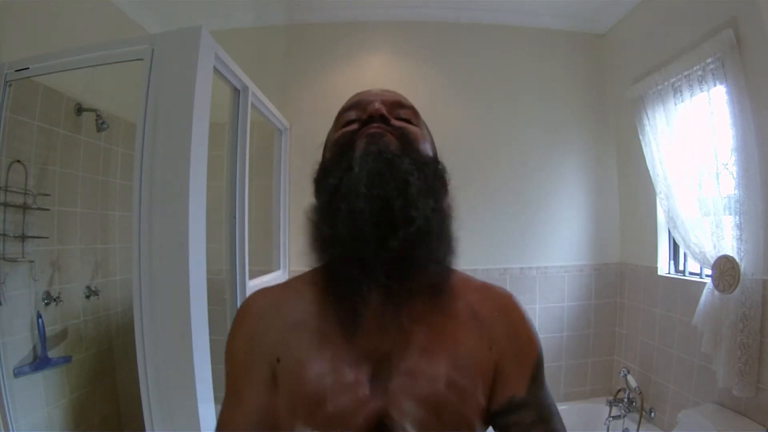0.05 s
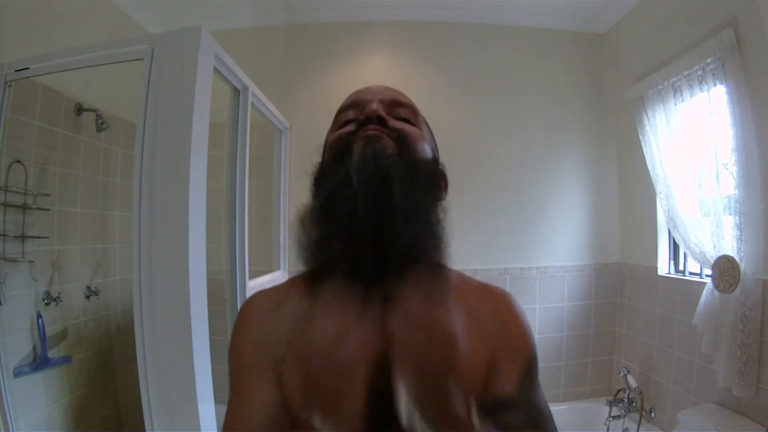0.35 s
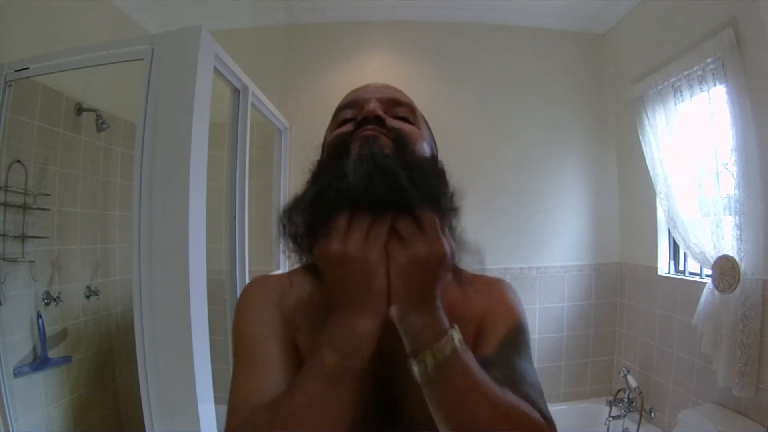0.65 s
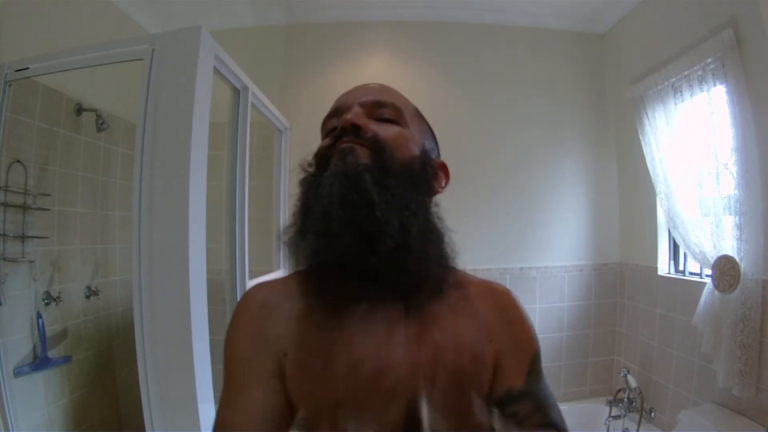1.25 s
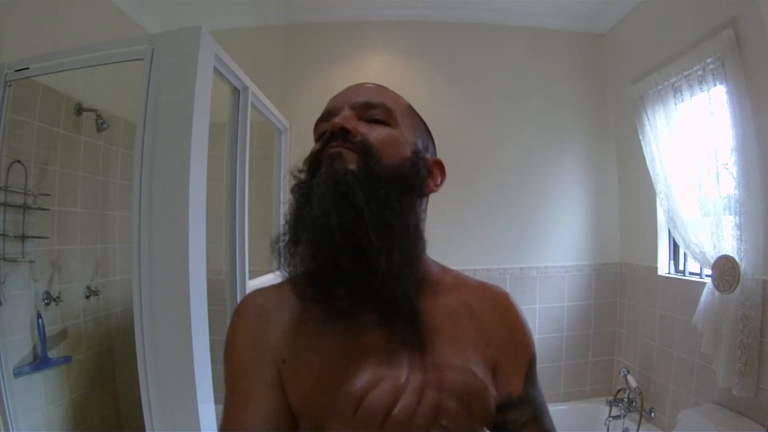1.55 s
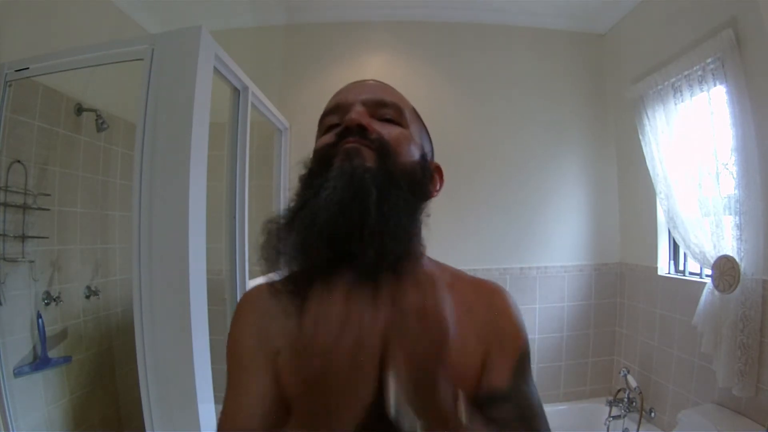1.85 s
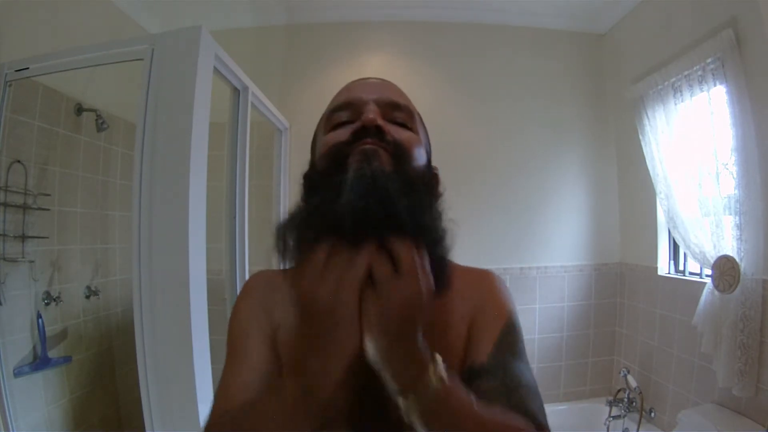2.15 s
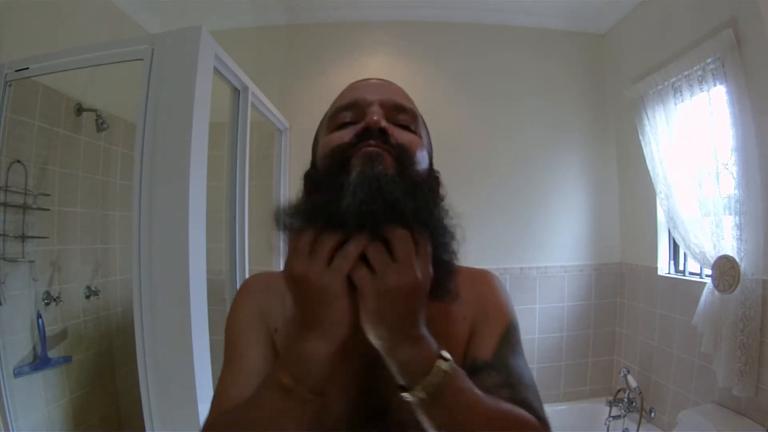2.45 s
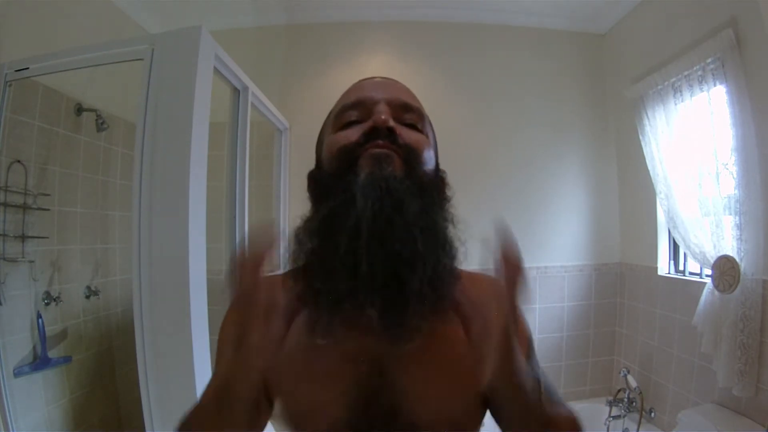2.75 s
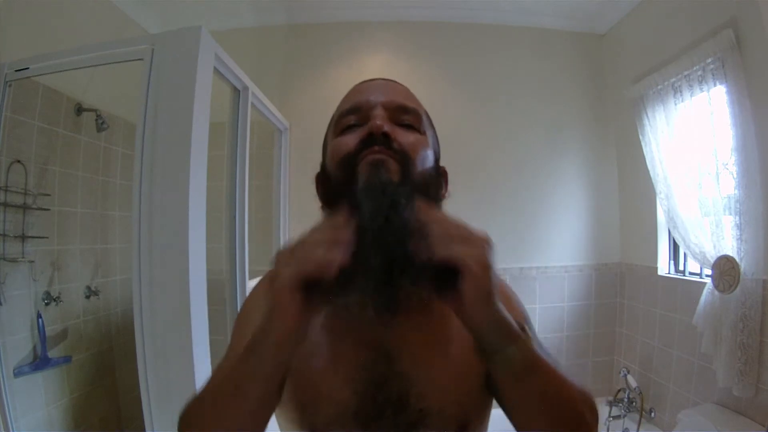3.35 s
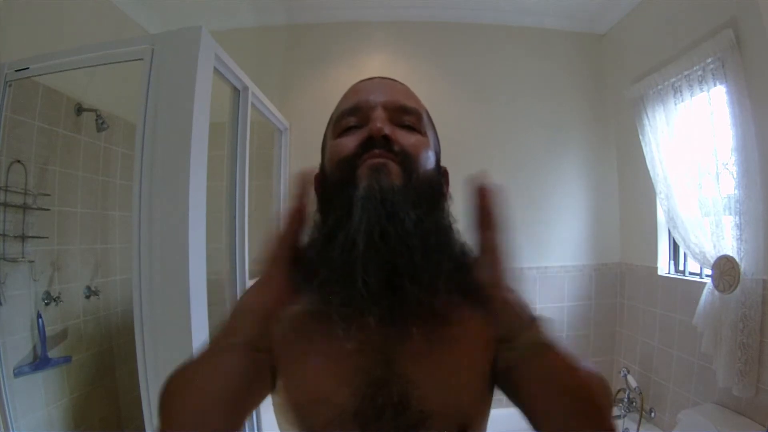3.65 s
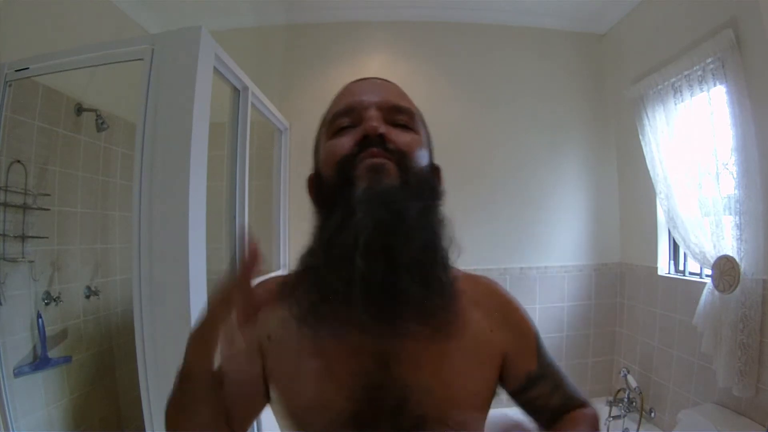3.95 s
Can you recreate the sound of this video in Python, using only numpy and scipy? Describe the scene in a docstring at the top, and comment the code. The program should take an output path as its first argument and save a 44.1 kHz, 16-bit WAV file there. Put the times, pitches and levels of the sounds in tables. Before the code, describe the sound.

Hands brush through a long beard in soft swishes, several a second, with duller skin rubs and a few short scratches. A fan hums and blows steadily in the small tiled bathroom, and the strokes sound straight ahead.

```python
"""Two hands brush up through a long beard in a small tiled bathroom, nearly three strokes a second.
Each stroke is a soft swish of countless hairs slipping past the fingers, with a duller rub of skin
and at times a hollow tone or a short scratch. A fan hums and blows steadily. A soft rush and a low
rumble swell and sink, and a thin electronic whine pulses faintly above them."""
import sys
import numpy as np
from scipy import signal
from scipy.fft import rfft, irfft
from scipy.io import wavfile
from scipy.ndimage import uniform_filter1d

SR = 44100
rng = np.random.default_rng(int(sys.argv[2]) if len(sys.argv) > 2 else 0)


def output_pcm(signal):
    """Save a mono or channel-first signal as 16-bit PCM at the path in sys.argv[1].

    Samples are clipped to [-1, 1] before scaling.
    """
    pcm = np.clip(np.atleast_2d(signal).T, -1, 1) * 32767
    wavfile.write(sys.argv[1], SR, np.round(pcm).astype(np.int16))


N = 176400
TIME_S = np.arange(N) / SR
FREQS_HZ = np.maximum(np.fft.rfftfreq(N, 1 / SR), 1)

# Hand strokes. Each row: time of fastest motion, rise and fall in seconds,
# hair swish, skin rub and hollow tone in dB, hollow tone pitch in Hz.
STROKES = [(.01, .04, 0.044, -64, -58.5, -64, 1510), (.185, 0.025, 0.037, -62.5, -69, -74, 1700),
           (.348, .056, 0.06, -59, -60, -64, 1760), (.535, 0.021, 0.033, -65.5, -62, -70, 1700),
           (.753, .045, 0.019, -56.5, -62, -56.5, 1690), (.84, 0.024, 0.064, -66, -62, -68, 1710),
           (1.126, 0.039, 0.03, -58, -56, -55.5, 1720), (1.36, 0.05, 0.042, -67, -64, -68, 1600),
           (1.503, 0.045, 0.04, -61.5, -60, -58.5, 1640), (1.64, 0.022, .025, -66, -68, -66, 1650),
           (1.865, 0.041, 0.033, -62, -59, -61, 1610), (2.20, 0.06, 0.046, -61.5, -62.5, -74, 1600),
           (2.44, 0.022, 0.02, -65, -57.5, -78, 1550), (2.564, 0.041, 0.056, -62, -60.5, -60.5, 1540),
           (2.73, 0.056, 0.091, -74, -63, -66, 1420), (2.85, 0.009, 0.013, -51.5, -61, -66, 1390),
           (2.95, 0.08, 0.067, -64.5, -57.5, -65, 1450), (3.43, 0.066, 0.096, -61.5, -65.5, -70, 1520),
           (3.755, .035, 0.036, -63.5, -64, -69, 1610)]
# Hair swish colour. Each row: frequency in Hz, relative level in dB.
HAIR_SPECTRUM = [(1500, 7), (3000, -2.5), (6000, -1), (9000, 1), (12500, 3.5), (15000, 2.5)]
# Skin rub colour. Each row: frequency in Hz, relative level in dB.
SKIN_SPECTRUM = [(250, -39), (600, 0.5), (1300, 1), (2100, -8), (3000, -5.5), (4200, -12.5), (7000, -19),
                 (14000, -41)]
# Fingertip scratches. Each row: peak time in seconds, rise and fall time in seconds,
# level in dB, centre in Hz.
SCRATCHES = [(0.364, 0.031, -68, 2950), (0.752, .03, -65, 2530), (1.128, .025, -72, 2580),
             (1.335, .008, -67, 4730), (1.52, 0.03, -66, 2600), (2.15, 0.02, -68, 3600),
             (2.844, 0.0053, -61.5, 4700), (2.943, .014, -68, 3700)]
# Fan hum. Each row: multiple of the turning rate, rms level in dB, flutter depth as a ratio.
FAN_ORDERS = [(2, -62.5, 0.88), (3, -45, 0.06), (4, -53.5, 0.49), (8, -60, 0.82), (12, -69, 0.22),
              (16, -74.5, 0.18), (18, -80, 0.44)]
# Fan resonances. Each row: centre in Hz, half-width in Hz, rms level in dB.
FAN_RESONANCES = [(361, 4.5, -63), (487, 3.9, -64.5), (571, 24, -62.5), (770.5, 9, -65), (5210, 7.8, -85.5),
                  (8620, 210, -82)]
# Fan air and even hiss. Each row: frequency in Hz, density in dB per Hz.
AIR_SPECTRUM = [(20, -77), (60, -80.5), (150, -80), (200, -79), (300, -77.5), (520, -79), (680, -85),
                (810, -81.5), (880, -88.5), (1030, -86), (1400, -89), (1750, -94), (2100, -97.5),
                (3000, -99.3), (3800, -103), (5100, -104), (6000, -106), (7800, -105.3), (10000, -107.3),
                (15000, -106.8)]
# Stereo width of the air. Each row: frequency in Hz, side minus mid in dB.
AIR_WIDTH = [(25, 0), (85, -17), (140, -22), (250, -54), (650, -51), (1300, -52), (2400, -16.5), (4400, -6),
             (8000, -4), (15000, -5.5)]
# Low-mid rush envelope. Each row: time in seconds, rms level in dB.
RUSH_ENVELOPE = [(0, -61), (.35, -59), (.75, -66), (2.25, -66), (2.45, -58.5), (2.95, -58.5), (3.3, -59),
                 (4, -60.5)]
# Low rumble envelope. Each row: time in seconds, rms level in dB.
RUMBLE_ENVELOPE = [(0, -73), (2.0, -67), (2.25, -56.5), (2.6, -63), (2.85, -53.5), (3.2, -65.5),
                   (3.55, -56), (4, -59)]

BASE_SLIPS_PER_S, SLIP_SPREAD_DB, HISS_POWER_SHARE = 9000, 3.5, 0.21
CATCH_DB, CATCH_RATE_HZ = 1.4, 48
SWELL_EXPONENT = 1.26   # 1 pointed, 2 round
HAND_SIDE_DB, ROOM_DB, ROOM_T60_S = -25, -8.5, 0.17
FAN_TURN_HZ, FAN_WANDER_HZ, FAN_FLUTTER_HZ = 83.83, 0.11, 3.6
WHINE_HZ, WHINE_ON_DB, WHINE_PULSE_HZ, WHINE_START_S = 7867, -70, 30.03, .0237
CUTOFF_HZ, CUTOFF_SLOPE_HZ = 15300, 100
LEFT_OFFSET, RIGHT_OFFSET = -.0661, .0638   # full scale 1


def hands():
    """Swish, rub, hollow tones and scratches, straight ahead, with room reflections."""
    swish_gain, rub_gain = stroke_gains()
    speed = swish_gain / swish_gain.max()
    hair, hair_side = (swish_gain * unit_rms(colour(hair_slips(speed), HAIR_SPECTRUM)) for _ in range(2))
    skin = rub_gain * unit_rms(colour(hair_slips(speed), SKIN_SPECTRUM))
    direct = hair + skin + hollow_tones() + scratches()
    return stereo(direct + from_db(ROOM_DB) * bathroom(direct), from_db(HAND_SIDE_DB) * hair_side)


def stroke_gains():
    """Swish and rub gains: strokes swell and fade while the fingers catch and slide unevenly."""
    power = np.zeros((2, N))
    for peak_s, rise_s, fall_s, hair_db, skin_db, _, _ in STROKES:
        power += from_db([hair_db, skin_db])[:, None] ** 2 * swell(peak_s, rise_s, fall_s)
    return np.sqrt(power) * from_db(CATCH_DB * drift(CATCH_RATE_HZ))


def swell(peak_s, rise_s, fall_s):
    """Power of a movement building to its fastest moment, then fading."""
    span_s = np.where(TIME_S < peak_s, rise_s, fall_s)
    return np.exp(-np.abs((TIME_S - peak_s) / span_s) ** SWELL_EXPONENT)


def hair_slips(speed):
    """Tiny uneven clicks, denser as the hand moves faster, on an even hiss."""
    chance = np.clip(BASE_SLIPS_PER_S * (.2 + speed) / SR, .001, 1)
    sizes = from_db(SLIP_SPREAD_DB * np.minimum(rng.exponential(1, N), 5))
    signs = rng.choice([-1, 1], N)
    clicks = unit_rms(sizes * signs * (rng.random(N) < chance) / np.sqrt(chance))
    return np.sqrt(1 - HISS_POWER_SHARE) * clicks + np.sqrt(HISS_POWER_SHARE) * white()


def hollow_tones():
    """Cupped hands ring at a pitch that changes from stroke to stroke."""
    noise = white()
    return sum(from_db(db) * np.sqrt(swell(peak_s, rise_s, fall_s)) * resonate(noise, hz, half_hz=200)
               for peak_s, rise_s, fall_s, _, _, db, hz in STROKES)


def scratches():
    """Fingertips rasp across the hairs; slow slips, so single hairs are heard."""
    slips = hair_slips(speed=0.21)
    return sum(from_db(db) * np.sqrt(swell(peak_s, span_s, span_s)) * resonate(slips, hz, half_hz=540)
               for peak_s, span_s, db, hz in SCRATCHES)


def bathroom(x):
    """Dense tile reflections, decaying evenly."""
    tail = white() * from_db(-60 * TIME_S / ROOM_T60_S) * (TIME_S > .004)
    return signal.fftconvolve(x, tail / np.sqrt(np.sum(tail ** 2)))[:N]


def fan_hum():
    """Fluttering multiples of the turning rate, plus narrow resonances."""
    turns = np.cumsum(FAN_TURN_HZ + FAN_WANDER_HZ * drift(rate_hz=1.54)) / SR
    hum = np.zeros(N)
    for order, db, depth in FAN_ORDERS:
        flutter = 1 + depth * (drift(FAN_FLUTTER_HZ) + 1j * drift(FAN_FLUTTER_HZ)) / np.sqrt(2)
        tone = np.exp(2j * np.pi * (order * turns + rng.random()))
        hum += from_db(db) * unit_rms(np.real(flutter * tone))
    return hum + sum(from_db(db) * resonate(white(), hz, half_hz) for hz, half_hz, db in FAN_RESONANCES)


def fan_air():
    """Steady airflow, centred in the midrange, wider in the hiss."""
    noise = stereo(white(), colour(white(), AIR_WIDTH))
    return np.sqrt(SR / 2) * colour(noise, AIR_SPECTRUM)


def rush():
    """Soft low-mid noise; sinks early, returns in the second half."""
    return envelope(RUSH_ENVELOPE) * resonate(white(), hz=698, half_hz=130)


def rumble():
    """Soft low noise; swells a few times in the second half."""
    return envelope(RUMBLE_ENVELOPE) * resonate(white(), hz=105, half_hz=70)


def whine():
    """Thin electronic tone, on for half of each pulse cycle."""
    on = ((TIME_S - WHINE_START_S) * WHINE_PULSE_HZ) % 1 < .5
    gate = uniform_filter1d(on.astype(float), size=110)
    return from_db(WHINE_ON_DB) * np.sqrt(2) * gate * np.sin(2 * np.pi * WHINE_HZ * TIME_S)


def from_db(db):
    """Decibels to gain."""
    return 10 ** (np.asarray(db) / 20)


def envelope(points):
    """Gain through points of seconds and dB."""
    return from_db(np.interp(TIME_S, *np.transpose(points)))


def unit_rms(x):
    """Scale to rms 1."""
    return x / np.sqrt(np.mean(x ** 2) + 1e-20)


def white():
    """White noise, rms 1."""
    return rng.standard_normal(N)


def drift(rate_hz):
    """Random wander, rms 1."""
    return resonate(white(), 0, rate_hz)


def colour(x, spectrum):
    """Filter by points of Hz and dB."""
    hz, db = np.transpose(spectrum)
    return irfft(rfft(x) * from_db(np.interp(np.log(FREQS_HZ), np.log(hz), db)), N)


def resonate(x, hz, half_hz):
    """Resonance, 6 dB down at half_hz either side of centre; output rms 1."""
    return unit_rms(irfft(rfft(x) / (1 + ((FREQS_HZ - hz) / half_hz) ** 2), N))


def stereo(mid, side):
    """Mid and side to left and right."""
    return np.array([mid + side, mid - side])


def scene():
    """Hands over the room's background."""
    return hands() + fan_hum() + fan_air() + rush() + rumble() + whine()


def record(dry):
    """Steep treble cut; a steady voltage offset on each input."""
    lowpass = np.clip((CUTOFF_HZ - FREQS_HZ) / CUTOFF_SLOPE_HZ + .5, 0, 1)
    return irfft(rfft(dry) * lowpass, N) + np.array([[LEFT_OFFSET], [RIGHT_OFFSET]])


dry = scene()
out = record(dry)
output_pcm(out)
```